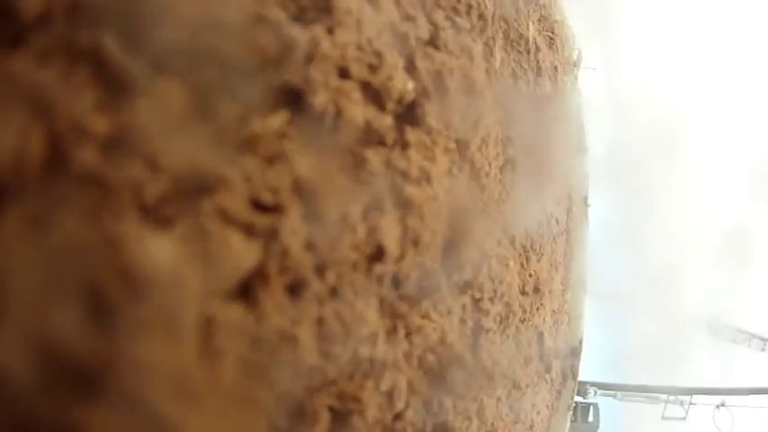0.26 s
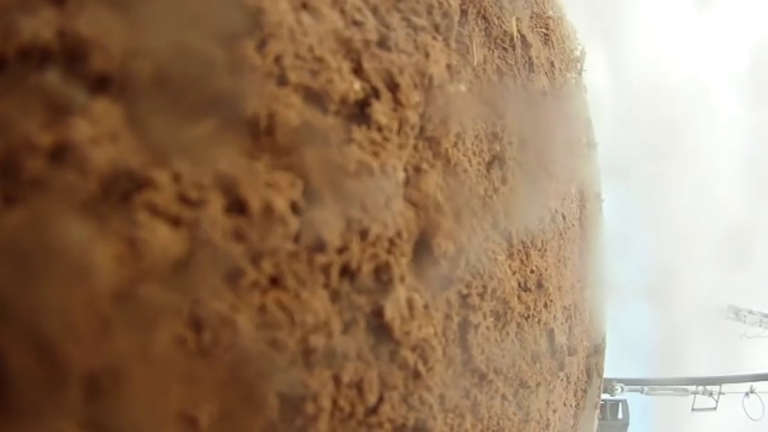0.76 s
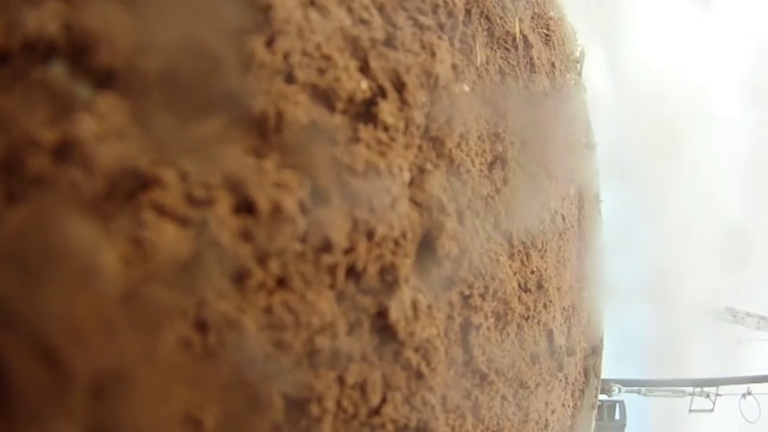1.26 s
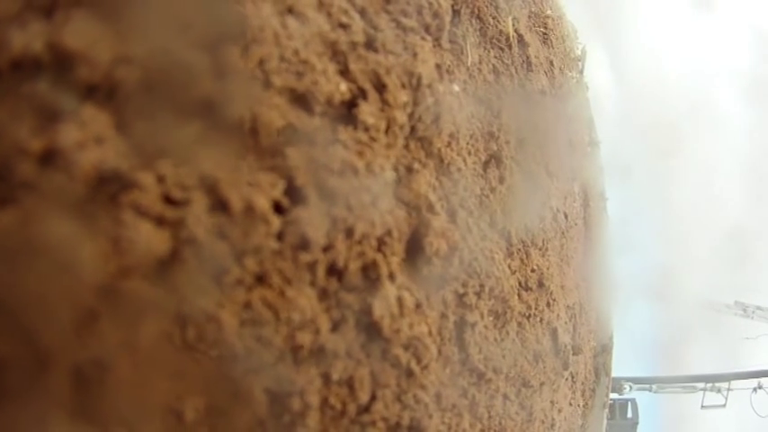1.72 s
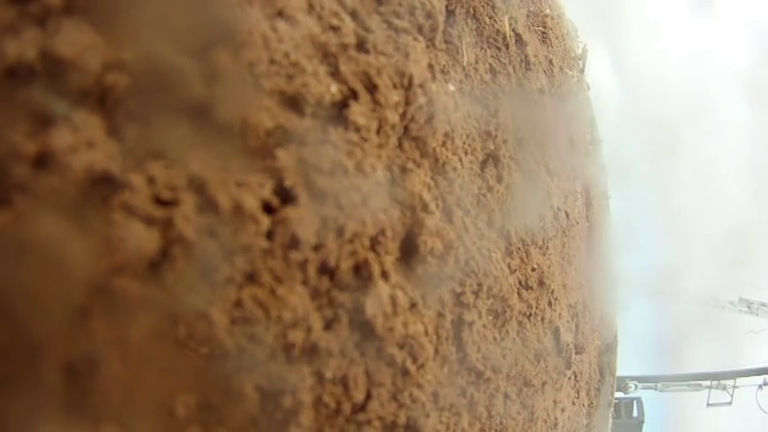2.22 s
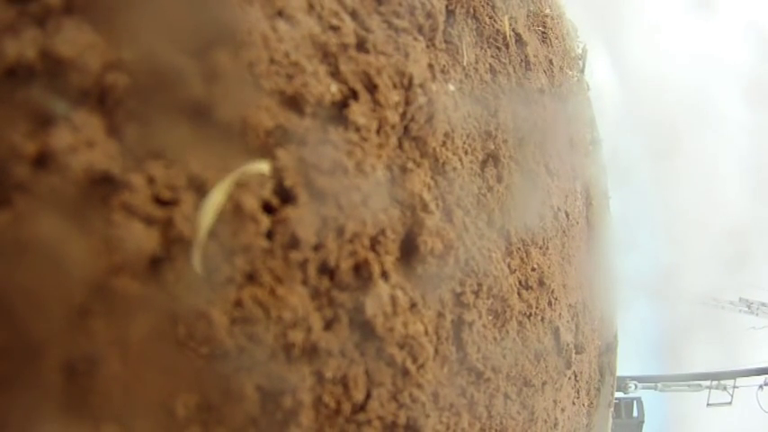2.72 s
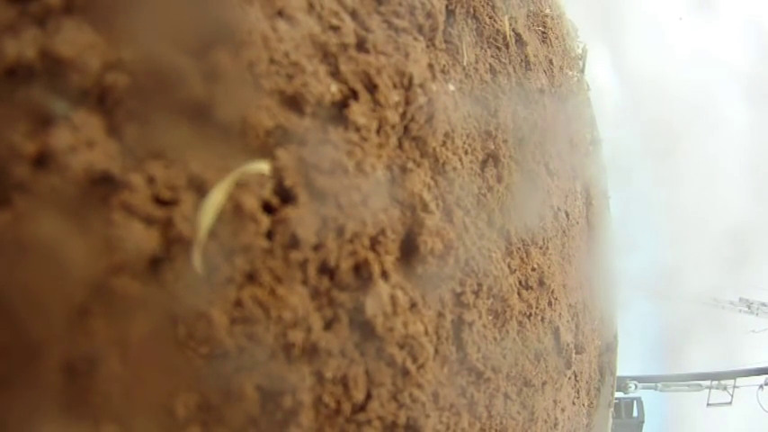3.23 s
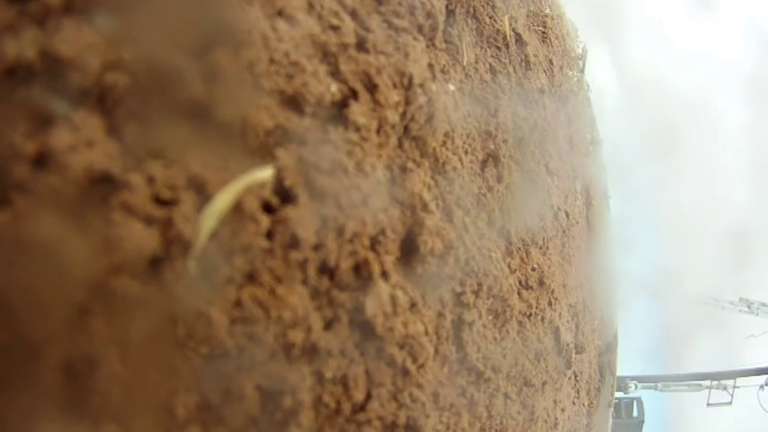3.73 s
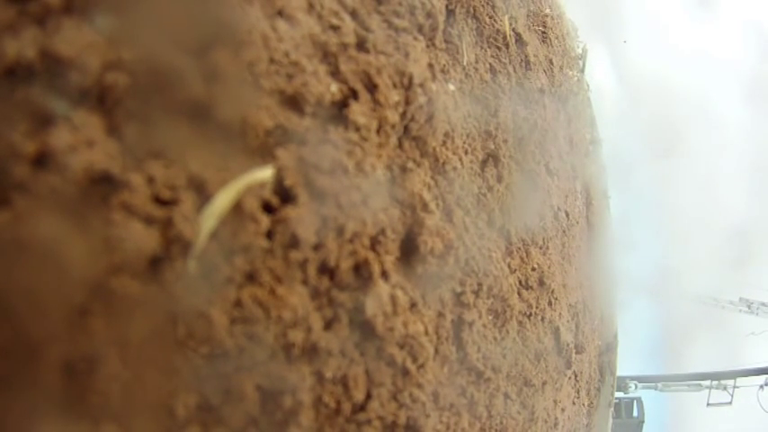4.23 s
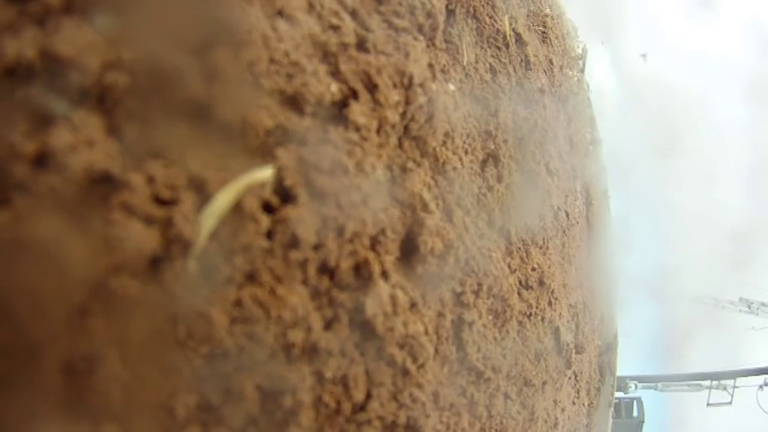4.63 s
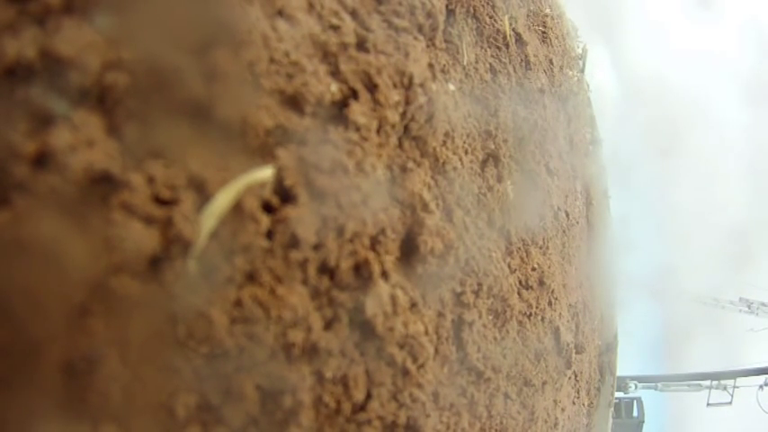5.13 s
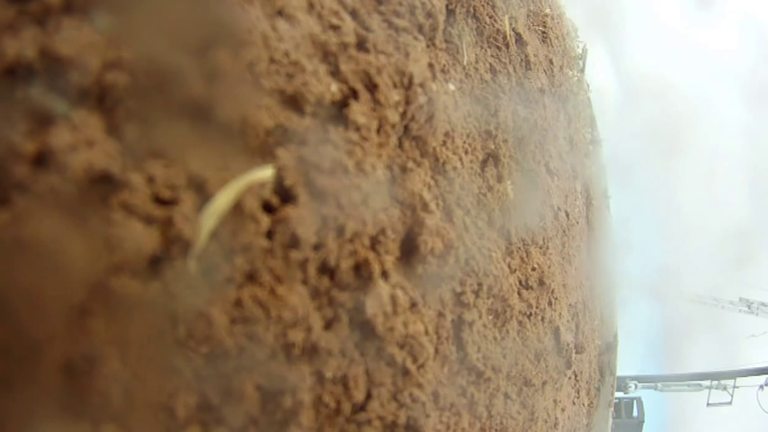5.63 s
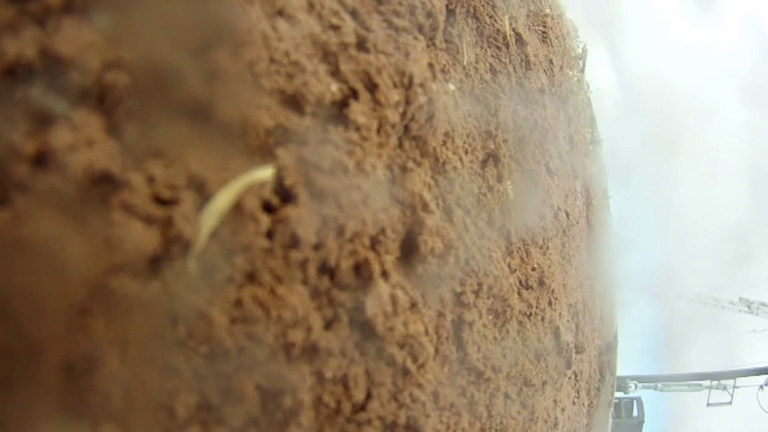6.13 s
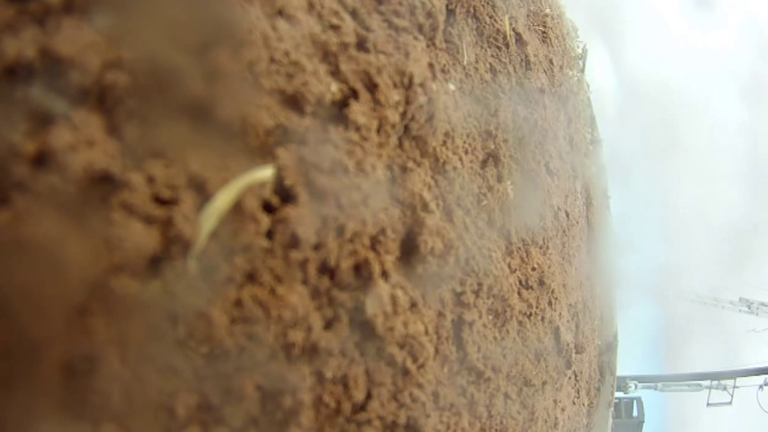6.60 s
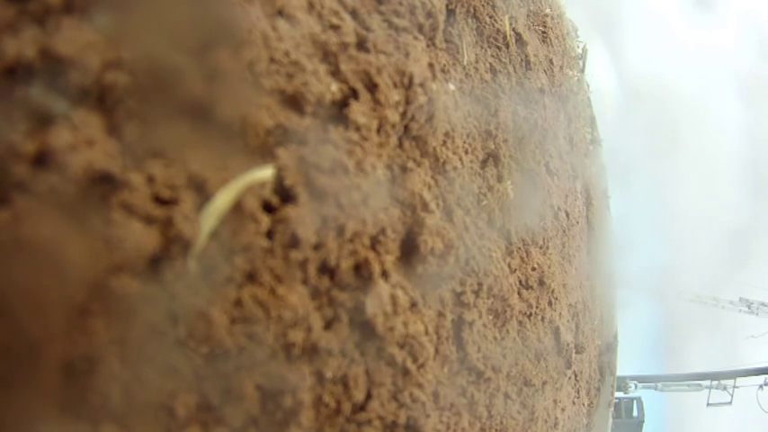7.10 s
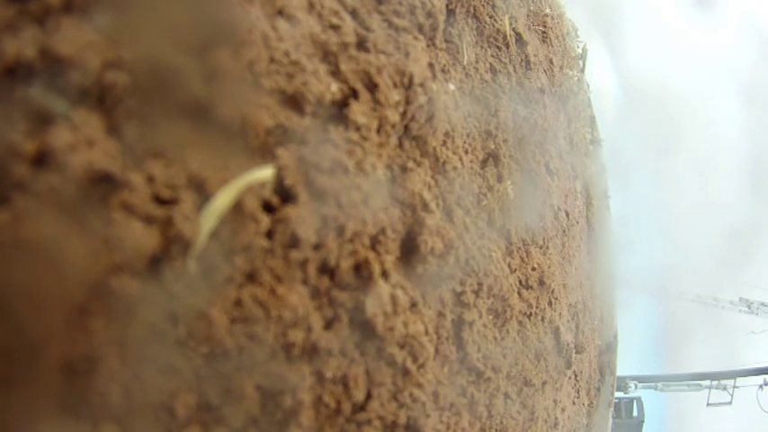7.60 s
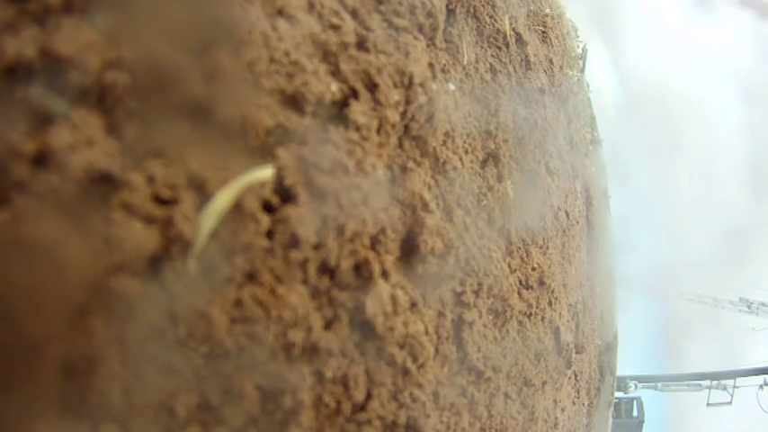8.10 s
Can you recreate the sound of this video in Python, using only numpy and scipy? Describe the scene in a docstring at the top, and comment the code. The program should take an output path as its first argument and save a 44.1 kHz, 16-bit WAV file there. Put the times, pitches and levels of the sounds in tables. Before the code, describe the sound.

Continuous deep rocket exhaust, heard from a microphone enclosed in a housing on the pad. It begins full, rumble and throaty roar under a thin hiss, then flutters and punches with low thuds and momentary dips. Small dry clicks crackle, thickest mid-way. As the rocket recedes the treble dies away and the roar weakens to a muffled rumble, with grit ticking on the housing twice. Dull, slightly grainy sound.

```python
"""A rocket climbs away from a microphone shut in a housing on the pad: from the start, layers of shaped noise
rumble, roar and hiss together. From 0.9 to 5.9 s low pressure surges push through, each followed by a brief
dip in level; dry clicks join from 1.9 s over a sparse crackle. With distance the bright hiss sinks and dulls
first, leaving mostly rumble. At 6.6 and 8.2 s grit ticks on the housing. The microphone signal is held at a
low sample rate throughout, which mirrors its spectrum faintly into the treble."""
import sys
import numpy as np
from scipy import signal
from scipy.fft import rfft, irfft, next_fast_len
from scipy.io import wavfile
from scipy.ndimage import uniform_filter1d, map_coordinates

SR = 44100
rng = np.random.default_rng(int(sys.argv[2]) if len(sys.argv) > 2 else 0)


def store_wav(level_fs):
    """Save 16-bit WAV to argv[1]."""
    pcm = np.round(np.clip(np.atleast_2d(level_fs), -1, 1) * 32767)
    wavfile.write(sys.argv[1], SR, pcm.T.astype(np.int16))


N = 368235  # length in samples


def amp(db):
    """Gain of a level in dB."""
    return 10 ** (np.asarray(db) / 20)


def unit(x):
    """x scaled to rms 1."""
    return x / np.sqrt(np.mean(x ** 2) + 1e-20)


def filtered(x, response):
    """x with its spectrum multiplied by a response of frequency, without phase shift."""
    m = next_fast_len(N + 8192)
    gain = response(np.fft.rfftfreq(m, 1 / SR))
    return irfft(rfft(x, m) * gain, m)[..., :N]


def wobble(rate):
    """A smooth random curve through `rate` random knots a second."""
    knots = rng.standard_normal(N // 100)
    return map_coordinates(knots, [np.arange(N) * rate / SR])


def rush(spectrum, patchy_db):
    """Turbulent noise of rms 1: a given colour, with random gain in patches of time and frequency."""
    z = signal.stft(rng.standard_normal(N), nperseg=512)[2]
    field = uniform_filter1d(rng.standard_normal(z.shape), size=6, axis=0)
    field = uniform_filter1d(field, size=8, axis=1)
    noise = signal.istft(z * amp(patchy_db * unit(field)), nperseg=512)[1][:N]
    f, db = np.transpose(spectrum)

    def colour(hz):
        return amp(np.interp(np.log(hz + 1), np.log(f + 1), db))
    return unit(filtered(noise, colour))


# the exhaust as it recedes: start_s, bass_db, roar_db, hiss_db (bass and hiss guide the other layers)
EXHAUST = [(0.0, -17, -23, -41.5), (0.44, -17, -20.5, -43.5), (1.19, -17.5, -22.5, -44),
           (1.63, -16.5, -22, -44.5), (2.32, -16, -23, -46.5), (2.95, -17, -21, -46),
           (3.21, -15.5, -19, -47), (3.25, -16, -23, -49), (4.44, -16, -24.5, -53),
           (6.35, -18.5, -28, -58.5), (6.65, -20, -27, -62.5), (7.25, -21.5, -31, -64.5),
           (7.98, -23.5, -32, -64.5), (8.35, -22, -31, -65)]
# relative colour of each layer, low to high: pitch_hz, level_db (per Hz)
RUMBLE_COLOUR = [(7.1, -67), (12, -20.5), (54, 1), (98, -1), (150, -5.5), (200, -32), (330, -120)]
GROWL_COLOUR = [(70, -32.5), (120, -9.5), (170, -1.5), (250, -3.5), (330, -9), (500, -66), (900, -120)]
ROAR_COLOUR = [(130, -64), (220, -18.5), (290, -2.5), (400, -2), (500, -5), (570, -9.5), (700, -20.5),
               (850, -40.5), (1100, -55.5), (1800, -120)]
UPPER_COLOUR = [(350, -39), (600, -5), (809, -5.5), (1300, -15), (1800, -26.5), (2340, -49.5), (3960, -120)]
# bright hiss on the housing's air resonance, then the same through more air: pitch_hz, level_db (per Hz)
BRIGHT_HISS_COLOUR = [(760, -32), (1300, -8), (1690, -6), (2130, -2.5), (2660, 0), (3000, -2), (3300, -9),
                      (3600, -18), (3950, -29), (5000, -60), (8000, -120)]
DULL_HISS_COLOUR = [(760, -30), (1300, -3), (1700, 0), (2400, -3), (2800, -7), (3300, -17), (3900, -30),
                    (5000, -60), (8000, -120)]
# the highest layer: pitch_hz, level_db (per Hz)
SIZZLE_COLOUR = [(2500, -30), (3300, 1), (3750, 0), (4070, -5), (4520, -1), (4900, -2), (5400, -8),
                 (5990, -14), (7800, -60)]
SWELL_DB, SWELL_RATE = .6, 3  # slow unevenness of rumble and growl: depth, knots a second
UPPER_SAG_DB, UPPER_SAG_S = 3, 4.3  # the upper roar thins most around the middle of the climb
DULL_FROM_DB, DULL_SPAN_DB = -35.5, 36  # hiss_db where dulling starts, and the fall that would complete it
SIZZLE_FADE_DB_PER_S = 2.5  # air takes the highest band faster still
FLOOR_DB = -72.5  # steady fizz left when the sizzle has gone


def jet():
    """Turbulent exhaust noise in six bands; the small eddies flutter together and fade first."""
    t = np.arange(N) / SR
    s, *controls = np.transpose(EXHAUST)
    bass_db, roar_db, hiss_db = [np.interp(t, s, c) for c in controls]

    def level(offset_db, share):
        """Level set from the bass, taking a share of the hiss's difference from it."""
        return offset_db + bass_db + share * (hiss_db - bass_db)

    def swell():
        return SWELL_DB * wobble(SWELL_RATE)

    flutter = 2.1 * wobble(30) + 1.0 * wobble(150)  # scaled into dB for each upper layer
    rumble = amp(level(-2.58, -0.054) + swell()) * rush(RUMBLE_COLOUR, patchy_db=-0.44)
    growl = amp(level(-2.5, 0.06) + swell()) * rush(GROWL_COLOUR, patchy_db=0.2)
    roar = amp(roar_db) * rush(ROAR_COLOUR, patchy_db=0.8)

    sag_db = UPPER_SAG_DB * np.exp(-((t - UPPER_SAG_S) / 1.7) ** 2)
    upper_db = level(-5, 0.59) - sag_db + 0.24 * flutter
    upper = amp(upper_db) * rush(UPPER_COLOUR, patchy_db=1.5)

    # cross-fade from bright to dull hiss at constant power
    turn = np.clip((DULL_FROM_DB - hiss_db) / DULL_SPAN_DB, 0, 1) * np.pi / 2
    bright = np.cos(turn) * rush(BRIGHT_HISS_COLOUR, patchy_db=0.2)
    dull = np.sin(turn) * rush(DULL_HISS_COLOUR, patchy_db=1.1)
    hiss = amp(hiss_db + 3 + 0.55 * flutter) * (bright + dull)

    sizzle_db = level(-6.5, 0.97) - SIZZLE_FADE_DB_PER_S * t + 0.58 * flutter
    sizzle_gain = np.hypot(amp(sizzle_db), amp(FLOOR_DB))
    sizzle = sizzle_gain * rush(SIZZLE_COLOUR, patchy_db=0.1)
    return rumble + growl + roar + upper + hiss + sizzle


# pressure surges at the microphone: crest_s, level_db (peak before the dip), dip_db
PRESSURE_SURGES = [(.918, -10, 6), (1.052, -11, 4.5), (1.268, -11, 6), (1.742, -12, 2), (2.185, -16, 3.5),
                   (2.38, -13, 5), (3.075, -14, 2.5), (3.212, -13, 2.5), (3.706, -8, 5.5), (3.876, -10, 6),
                   (4.102, -10, 3), (4.255, -14, 3), (4.627, -13, 3.5), (4.783, -13, 3.5), (4.902, -13, 4),
                   (5.204, -13, 2.5), (5.345, -13, 2.5), (5.417, -11, 3), (5.903, -13, 3.5)]
SURGE_HZ, ONSET_S, RECOVERY_S = 76, 0.0019, 0.051  # pitch of the push; onset and decay of the dip


def surges():
    """Short low pushes of pressure, and the gain that dips at each crest and creeps back."""
    t, push, dip_db = np.arange(N) / SR, np.zeros(N), np.zeros(N)
    for s, db, drop_db in PRESSURE_SURGES:
        near = slice(round((s - .05) * SR), round((s + .6) * SR))
        u = t[near] - s
        envelope = np.exp(-(1.52 * SURGE_HZ * u) ** 2)
        push[near] += amp(db) * np.cos(2 * np.pi * SURGE_HZ * u) * envelope
        onset = np.clip(u / ONSET_S, 0, 1)
        dip_db[near] -= drop_db * onset * np.exp(-np.abs(u) / RECOVERY_S)
    return push, amp(dip_db)


# grit striking the housing: start_s, level_db (before filtering), pitch_hz it rings best
GRIT_STRIKES = [(6.6315, -33, 3200), (8.1757, -34, 4200)]
# the housing's modes: pitch_hz, level_db (before the strike's weighting), t60_s
HOUSING_MODES = [(2700, -2, .009), (3200, 0, .009), (3900, -2, .008), (4600, -1, .007)]


def grit():
    """Each grain cracks on the housing, rings its modes for milliseconds and leaves a short grainy tail."""
    out, t = np.zeros(N + SR), np.arange(SR // 20) / SR
    for s, db, centre_hz in GRIT_STRIKES:
        ring = np.zeros(len(t))
        for hz, level, t60 in HOUSING_MODES:
            # 3 dB weaker per kHz from the favoured pitch, give or take a random dB
            mode_db = level - 3 * abs(hz - centre_hz) / 1000 + rng.normal(0, 1)
            ring += amp(mode_db - 60 * t / t60) * np.sin(2 * np.pi * hz * t)
        tail = amp(-10 - 60 * t / .06) * rng.standard_normal(len(t))
        attack = 1 - np.exp(-t / 0.00023)
        out[round(s * SR):][:len(t)] += amp(db) * (ring + tail) * attack
    return filtered(out[:N], lambda hz: np.exp(-((hz - 3600) / 1700) ** 2))


# faint dry clicks, many on the crest of a surge: start_s, level_db (before filtering)
DRY_CLICKS = [(1.876, -16), (1.937, -18), (2.056, -19), (3.212, -13), (3.635, -18), (3.706, -12),
              (3.876, -12), (4.102, -15), (4.254, -18), (4.455, -18), (4.498, -15), (4.627, -13),
              (4.783, -14), (4.795, -18), (4.902, -18), (5.018, -18), (5.067, -17), (5.139, -15),
              (5.165, -19), (5.204, -17), (5.345, -17), (5.417, -19), (5.535, -19), (5.552, -16),
              (5.826, -18), (5.888, -20), (5.903, -20), (6.577, -20), (6.772, -20), (6.778, -20),
              (7.027, -22)]
# random crackle: count, lowest level and mean rise above it (before filtering)
CRACKLE_COUNT, CRACKLE_DB, CRACKLE_SPREAD_DB = 90, -32, 3


def clicks():
    """Single-sample kinks of either sign amid a mostly fainter random crackle: no ring, duller at the top."""
    s, db = np.transpose(DRY_CLICKS)
    out = np.zeros(N)
    out[np.round(s * SR).astype(int)] = amp(db) * rng.choice([-1, 1], len(s))
    size_db = CRACKLE_DB + CRACKLE_SPREAD_DB * rng.exponential(size=CRACKLE_COUNT)
    places = rng.integers(0, N, CRACKLE_COUNT)
    out[places] = amp(size_db) * rng.choice([-1, 1], CRACKLE_COUNT)

    def band(hz):
        low_cut = hz ** 2 / (hz ** 2 + 2200 ** 2)
        return low_cut * np.exp(-(hz / 3900) ** 2)
    return filtered(out, band)


def scene():
    """Everything that reaches the single microphone; only the exhaust and surges dip in level."""
    push, dip_gain = surges()
    exhaust = dip_gain * (jet() + push)
    fade = np.clip((N - np.arange(N)) / (SR // 200), 0, 1)  # last 5 ms
    return (fade * (exhaust + clicks() + grit()))[None]


HELD_HZ, TOP_HZ = 12000, 15700  # rate of the held samples; nothing is left from TOP_HZ up


def record(dry):
    """Each sample is held four times, then read along straight lines: weak mirrors of the bass in the treble."""
    held = np.repeat(signal.resample_poly(dry[0], HELD_HZ, SR), 4)
    position = np.arange(N) * 4 * HELD_HZ / SR
    read = np.interp(position, np.arange(len(held)), held)
    return filtered(read, lambda hz: hz < TOP_HZ)[None]


dry = scene()
out = record(dry)
store_wav(out)
```